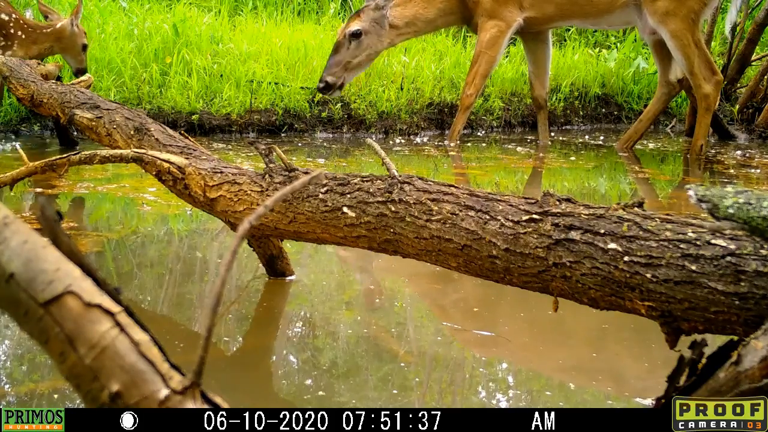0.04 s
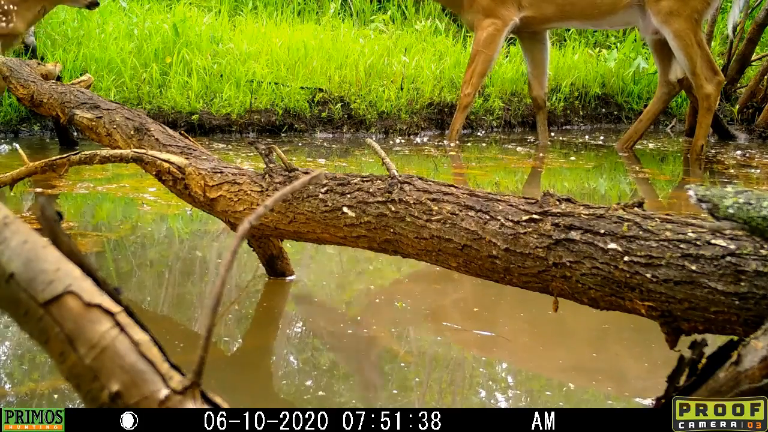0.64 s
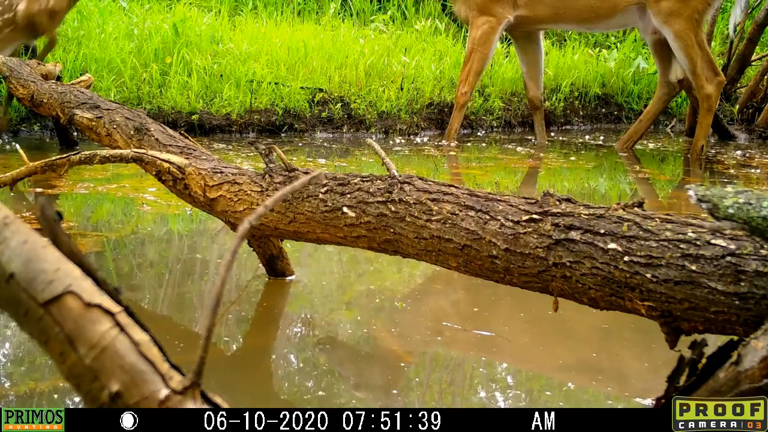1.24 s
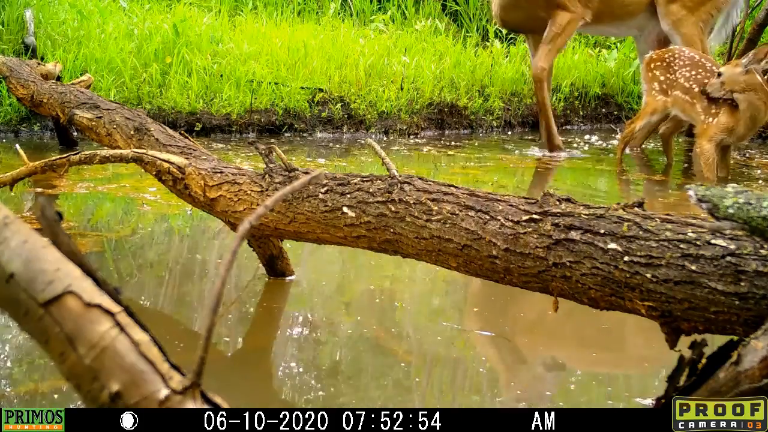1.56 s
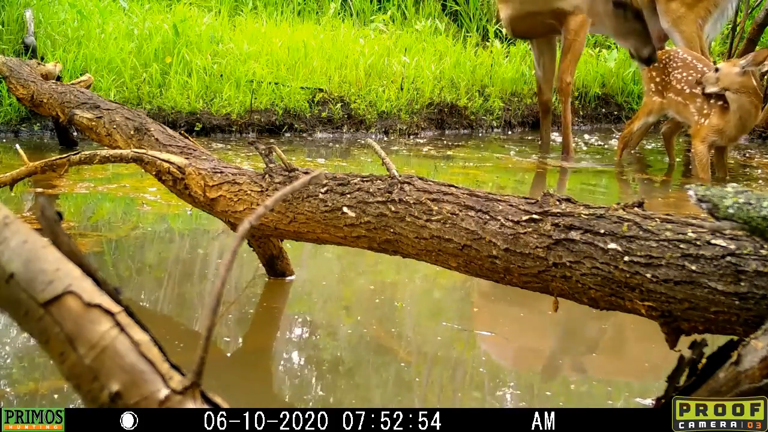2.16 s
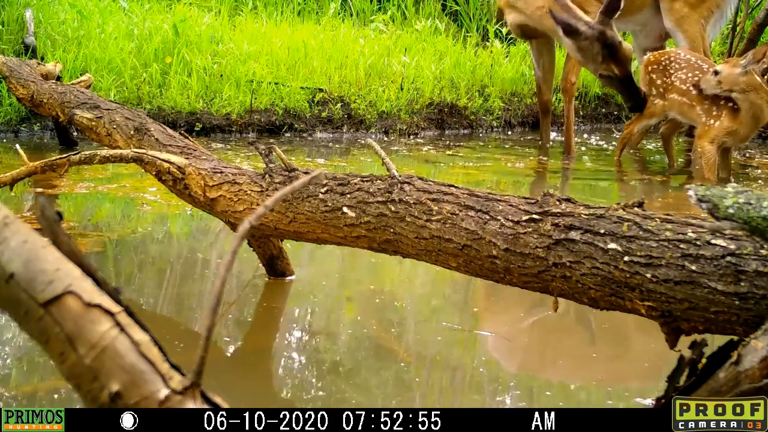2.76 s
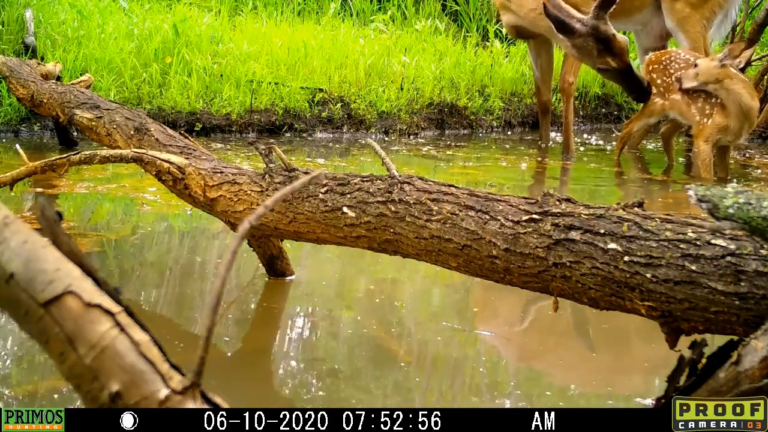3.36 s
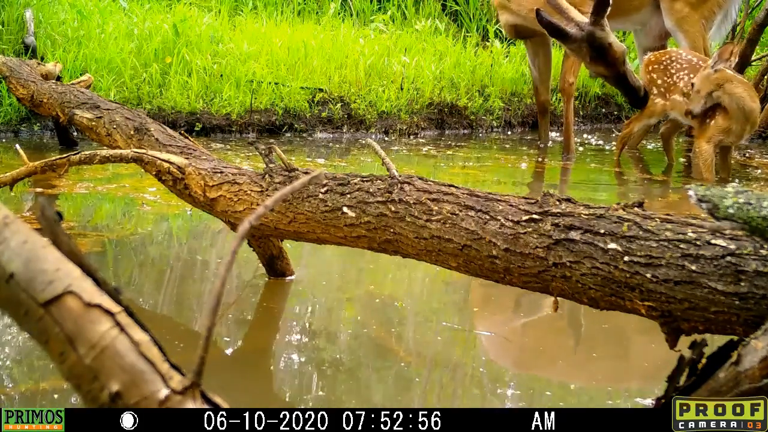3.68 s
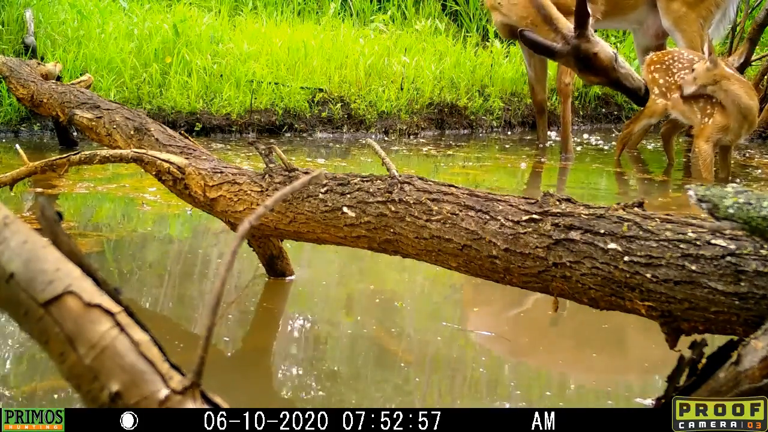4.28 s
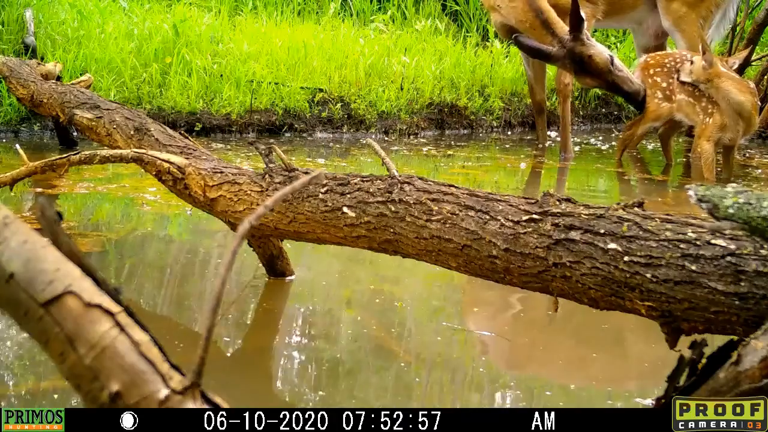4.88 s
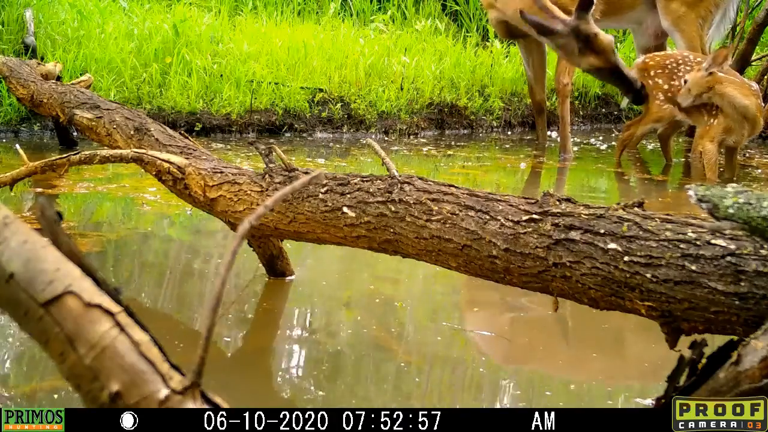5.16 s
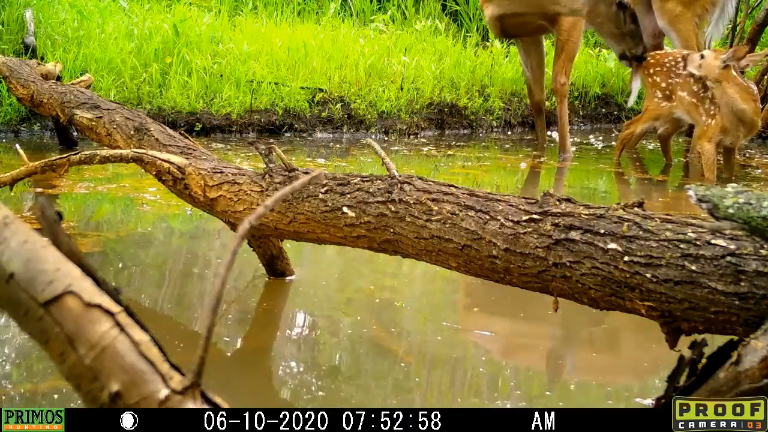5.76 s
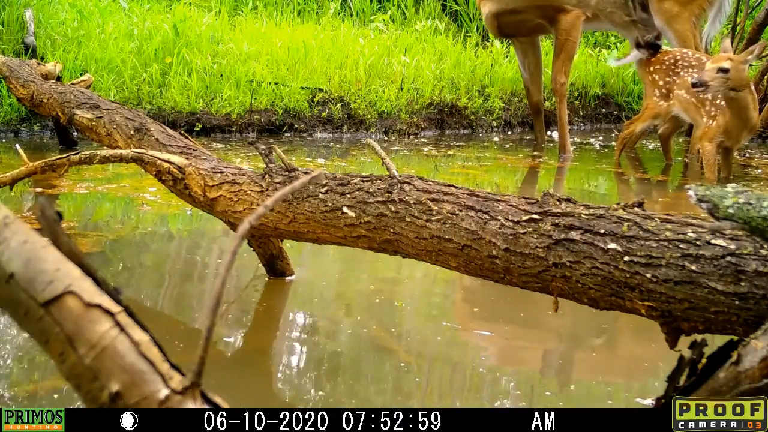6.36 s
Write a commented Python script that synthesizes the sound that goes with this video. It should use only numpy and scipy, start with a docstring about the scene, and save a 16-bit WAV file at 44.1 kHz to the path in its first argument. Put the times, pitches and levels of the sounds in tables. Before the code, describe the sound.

A nearby bird sings thin climbing notes, a hoof splashes once, and farther birds chirp through a steady woodland rumble.

```python
"""A woodland pool with songbirds, heard by a mono trail camera over low outdoor rumble and hiss.
The nearest bird whistles a rising row of thin hooked notes, ending in a slur buzzed by its fluttering
syrinx, and later repeats the song from farther off. Others twitter among the trees, their notes
echoing off foliage and trunks. A wading deer's hoof splashes once. The camera's electronics whine
faintly, and the sound drops out as it pauses between two shots."""
import sys
import numpy as np
from scipy import signal
from scipy.fft import rfft, irfft, next_fast_len
from scipy.io import wavfile
from scipy.ndimage import map_coordinates

SR = 44100
rng = np.random.default_rng(int(sys.argv[2]) if len(sys.argv) > 2 else 0)


def dump_mix(stems):
    """Bounce the given channels to the path in sys.argv[1] as a 16-bit WAV at rate SR."""
    frames = np.atleast_2d(stems).T  # one column per channel
    limited = np.clip(frames, -1, 1)  # hard clip at full scale
    pcm = np.round(limited * 32767).astype(np.int16)
    wavfile.write(sys.argv[1], SR, pcm)


N = 283122


def amp(db):
    """Decibels to gain."""
    return 10 ** (np.asarray(db) / 20)


def unit(x):
    """x scaled to rms 1."""
    return x / np.sqrt(np.mean(x ** 2) + 1e-20)


def clock(length_s):
    """Sample times in seconds."""
    return np.arange(round(length_s * SR)) / SR


def wobble(rate, size):
    """A smooth random curve, rate knots a second."""
    knots = rng.standard_normal(int(size * rate / SR) + 4)
    return map_coordinates(knots, [np.arange(size) * rate / SR])


def filtered(x, response):
    """EQ x with a gain curve given as a function of frequency."""
    size = next_fast_len(len(x) + 8192)
    return irfft(rfft(x, size) * response(np.fft.rfftfreq(size, 1 / SR)), size)[:len(x)]


def band(centre_hz, octaves, size):
    """Noise of rms 1 in a bell-shaped band."""
    bell = lambda hz: np.exp(-.5 * (np.log2((hz + 1) / centre_hz) / octaves) ** 2)
    return unit(filtered(rng.standard_normal(size), bell))


def add(track, start_s, sound):
    """Mix a sound in at start_s."""
    start = max(0, round(start_s * SR))
    track[start:start + len(sound)] += sound[:max(0, N - start)]


def whistle(pitch_hz, edge):
    """A bird's pure tone, faded in and out over the share edge of its length."""
    fade = signal.windows.tukey(len(pitch_hz), edge)
    return np.sqrt(2) * np.sin(2 * np.pi * np.cumsum(pitch_hz) / SR) * fade


def woods(x, wet_db, t60, near_db, near_t60):
    """Direct sound, quick scatter from near foliage and a longer answer from the trunks."""
    t = clock(.9)

    def scatter(decay_s, build_s):
        return unit(rng.standard_normal(len(t)) * amp(-60 * t / decay_s) * (1 - np.exp(-t / build_s)))

    trunks = amp(wet_db) * scatter(t60, build_s=.017)
    foliage = amp(near_db) * scatter(near_t60, build_s=.0034)
    impulse = (trunks + foliage) / np.sqrt(len(t))
    impulse[0] += 1  # direct sound
    return signal.fftconvolve(x, impulse)


def outdoor_air():
    """A gently wavering bed of low rumble that slopes into hiss."""
    # noise spectrum: frequency_hz, relative_db
    spectrum = [(12, -14), (20, 1), (52, -2), (93, -5.5), (122, -7), (152, -7.5), (397, -15.5),
                (494, -18.5), (668, -20.5), (766, -23), (928, -25), (3270, -39), (5820, -38.5),
                (8320, -44.5), (14000, -48)]
    points_hz, points_db = np.transpose(spectrum)
    colour = lambda hz: amp(np.interp(np.log(hz + 1), np.log(points_hz), points_db))
    bed = unit(filtered(rng.standard_normal(N), colour))
    return bed * amp(-34.5 + .48 * wobble(3.11, N))


def camera_whine():
    """The camera's electronics leave thin steady tones under the hiss."""
    # whine partials: pitch_hz, level_db
    tones = [(7827, -81), (9211, -84), (9830, -82), (11041, -83), (12425, -86), (12893, -85), (13808, -84)]
    t = np.arange(N) / SR
    return sum(np.sqrt(2) * amp(db) * np.sin(2 * np.pi * hz * t + .3 * wobble(5.5, N))
               for hz, db in tones)


def far_chorus():
    """Far birds blur into a narrow, shimmering band of noise."""
    # the chorus's rise and fall: time_s, relative_db
    swells = [(0, -64), (.8, -66), (1.45, -59.5), (1.8, -57), (2.2, -62), (2.9, -55), (3.4, -59),
              (3.9, -63), (4.5, -60), (5.2, -62), (5.9, -55), (6.42, -58)]
    swell_db = np.interp(np.arange(N) / SR, *np.transpose(swells))
    return band(centre_hz=5800, octaves=.05, size=N) * amp(swell_db - 5 + 1.5 * wobble(8.2, N))


def chirp(length_s, arc_hz, db, distance):
    """A quavering note through its first, middle and last pitch; the farthest are mostly echo."""
    progress = np.linspace(0, 1, round(length_s * SR))
    pitch_hz = np.polyval(np.polyfit([0, .5, 1], arc_hz, 2), progress)
    quaver_hz = 150 * distance * wobble(261, len(progress))
    shade_db = 11 * distance
    note = amp(db - shade_db) * whistle(pitch_hz + quaver_hz, edge=.12)
    return woods(note, wet_db=shade_db - .5, t60=1.0, near_db=shade_db - 2, near_t60=.12)


def scattered_birds():
    """Single rises, level whistles and sagging calls dotted among the trees."""
    # short rising notes: start_s, top_hz, level_db
    rises = [(2.825, 4400, -58), (3.041, 5100, -52), (3.202, 5160, -51), (5.447, 5790, -57),
             (5.792, 6200, -58)]
    # level whistles: start_s, length_s, pitch_hz, level_db, distance (0-1)
    level_whistles = [(0, .1, 5120, -56.5, .6), (1.645, .045, 4120, -61, 0.12),
                      (2.783, .05, 5660, -53.5, .6), (3.067, 0.064, 6930, -53, .36),
                      (3.22, .053, 7170, -56, .8), (4.622, 0.04, 5510, -53, 0.5),
                      (5.17, .085, 5150, -52, 0.78)]
    # sagging calls from deep in the trees: start_s, level_db
    sagging_calls = [(1.40, -58.5), (1.61, -60), (1.76, -59), (2.43, -61), (2.56, -59), (5.728, -52),
                     (5.969, -49.5), (6.200, -50.5)]
    rise_hz = 450
    out = np.zeros(N)
    for start_s, top_hz, db in rises:
        arc_hz = (top_hz - rise_hz, top_hz - rise_hz / 8, top_hz)
        add(out, start_s, chirp(.038, arc_hz, db, distance=.72))
    for start_s, length_s, hz, db, distance in level_whistles:
        add(out, start_s, chirp(length_s, (hz, hz, hz), db, distance))
    for start_s, db in sagging_calls:
        add(out, start_s, chirp(.048, (5930, 5790, 5360), db, distance=.67))
    return out


def twitterer():
    """A far bird mixes steep two-part downslurs with low falling notes."""
    # a faint high lead-in, then a louder low stroke: start_s, level_db
    downslurs = [(2.645, -48.5), (2.878, -45), (3.056, -52), (3.277, -44.5)]
    # low falling notes: start_s, level_db
    low_falls = [(3.005, -53), (3.160, -52.5), (3.335, -55)]
    lead_s, lead_hz = .024, (7180, 6410, 5830)
    stroke_s, stroke_hz = .028, (6270, 5450, 4830)
    out = np.zeros(N)
    for start_s, db in downslurs:
        add(out, start_s, chirp(lead_s, lead_hz, db - 6.5, distance=.6))
        add(out, start_s + lead_s, chirp(stroke_s, stroke_hz, db, distance=.98))
    for start_s, db in low_falls:
        add(out, start_s, chirp(.038, (4710, 4280, 3860), db, distance=.9))
    return out


def warbler():
    """A bird sings the tail of its low phrase, then the whole phrase twice."""
    # three arches, a two-note fall and a rise:
    # offset_s, length_s, first_hz, middle_hz, last_hz, level_db, distance (0-1)
    phrase = [(0, .032, 3470, 4030, 3380, -55, 0.1), (.094, .038, 4500, 4940, 3700, -50.5, .75),
              (0.14, 0.028, 4220, 4640, 4200, -56, .7), (.223, .034, 6430, 5790, 4940, -49, 0.5),
              (.254, .036, 4850, 4250, 3500, -55.5, .35), (0.341, .05, 4660, 5110, 5300, -51, 0.53)]
    # passes through the phrase: start_s, gain_db, first_note (rounded to an index)
    repeats = [(4.232, -7, 4), (4.753, 0.5, 0.5), (5.276, 0, 0)]
    out = np.zeros(N)
    for start_s, gain_db, first_note in repeats:
        for offset_s, length_s, *arc_hz, db, distance in phrase[round(first_note):]:
            add(out, start_s + offset_s, chirp(length_s, arc_hz, gain_db + db, distance))
    return out


def hoof_splash():
    """Brief bursts of spray as a deer's hoof breaks the surface."""
    # spray bursts: start_s, level_db, t60_s, centre_hz
    bursts = [(1.151, -33, .005, 5440), (1.162, -45, 0.044, 5800), (1.1703, -31, .014, 8300),
              (1.173, -34, 0.022, 3930), (1.182, -40, .02, 6300), (1.2, -39, 0.022, 4900)]
    out, t = np.zeros(N), clock(.095)
    attack = 1 - np.exp(-t / .00031)
    for start_s, db, t60_s, centre_hz in bursts:
        spray = band(centre_hz, octaves=.35, size=len(t)) * amp(db - 60 * t / t60_s) * attack
        add(out, start_s, woods(spray, wet_db=-18.5, t60=.4, near_db=-5, near_t60=.099))
    return out


def hooked_notes():
    """The lead bird's notes sweep from a faint high shoulder onto a held pitch, swelling as they land."""
    # two rising rows, near then far: start_s, held_hz, level_db, distance (0-1)
    notes = [(.079, 7260, -60, .1), (.232, 7340, -51, 0), (.383, 7520, -45, 0), (.527, 7720, -43, .08),
             (.668, 7990, -43, .1), (.799, 8130, -42.5, 0), (4.425, 7610, -57, 1), (4.555, 7650, -52.5, 1),
             (4.690, 7840, -47.5, 1), (4.828, 8020, -45.5, .9), (4.964, 8210, -47, 1)]
    length_s, shoulder_s, settle_s, swell_s = .076, .013, .014, .029
    drop_hz = 1830
    out, t = np.zeros(N), clock(length_s)
    height = np.exp(-np.maximum(t - shoulder_s, 0) / settle_s)
    swell_db = -19.5 * np.maximum(1 - t / swell_s, 0) - 3.4 * (1 - t / length_s)
    for start_s, held_hz, db, distance in notes:
        # distance dulls the high start of the note and trades direct sound for echo
        dull_db = 4 * distance * height
        shade_db = 12 * distance
        pitch_hz = held_hz + drop_hz * height + 40 * wobble(300, len(t))
        note = amp(db + swell_db - dull_db - shade_db) * whistle(pitch_hz, edge=.13)
        echoing = woods(note, wet_db=shade_db - 6.5, t60=.51, near_db=shade_db - 6, near_t60=.083)
        add(out, start_s, echoing)
    return out


def slur(buzz_hz, buzz_gain, sharp_hz, swell_db):
    """A fast flutter of the syrinx roughens a held note, which climbs, then drops as a clean whistle."""
    # the slur's contour: time_s, pitch_hz, relative_db, base_depth_hz (of the buzz)
    contour = [(0, 5920, -19.5, 100), (.010, 6253, 0, 210), (.052, 6170, -1, 210), (.064, 6740, -5.5, 580),
               (.101, 7500, -7.5, 280), (.113, 7000, -10, 40), (.121, 6050, 3, 30), (.142, 4950, -12, 130),
               (.161, 4450, -17, 70)]
    times_s, *curves = np.transpose(contour)
    t = clock(times_s[-1])
    progress = t / times_s[-1]
    pitch_hz, db, depth_hz = (np.interp(t, times_s, curve) for curve in curves)
    flutter = np.sin(2 * np.pi * buzz_hz * t + .5 * wobble(82, len(t)))
    tremolo_db = 2.5 * flutter * depth_hz / depth_hz.max()
    vibrato_hz = flutter * np.minimum(buzz_gain * depth_hz, depth_hz.max())
    tone = whistle(pitch_hz + sharp_hz * (1 - progress) + vibrato_hz, edge=.02)
    return amp(db + swell_db * progress - tremolo_db) * tone


def closing_slurs():
    """The lead bird's ending, first close by, then sharper and raspier from deeper in the trees."""
    out = np.zeros(N)
    near = amp(-32.5) * slur(buzz_hz=143.7, buzz_gain=.9, sharp_hz=0, swell_db=-1.5)
    far = amp(-50.5) * slur(buzz_hz=141, buzz_gain=1.76, sharp_hz=250, swell_db=7)
    add(out, .903, woods(near, wet_db=-4, t60=.56, near_db=-3.5, near_t60=.083))
    add(out, 5.069, woods(far, wet_db=4, t60=.6, near_db=2, near_t60=.17))
    return out


def scene():
    """Birds, water, outdoor air and whine, mixed to mono on both channels."""
    birds = hooked_notes() + closing_slurs() + warbler() + twitterer() + scattered_birds()
    mono = birds + hoof_splash() + outdoor_air() + far_chorus() + camera_whine()
    return np.array([mono, mono])


def record(dry):
    """The camera is silent between its two shots and keeps nothing above its band limit."""
    pause_s, resume_s, top_hz = 1.2703, 1.3922, 14050
    t = np.arange(N) / SR
    running = (t < pause_s) | (t > resume_s)
    return np.array([filtered(channel * running, lambda hz: hz < top_hz) for channel in dry])


dry = scene()
out = record(dry)
dump_mix(out)
```